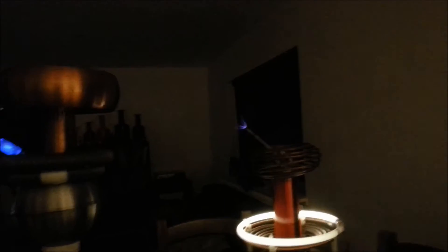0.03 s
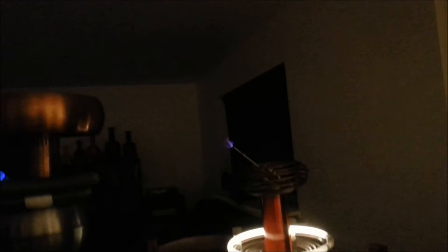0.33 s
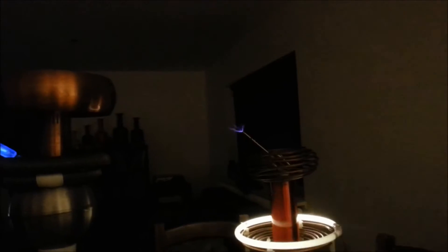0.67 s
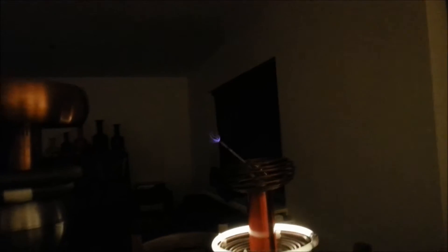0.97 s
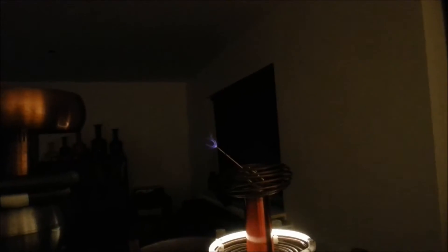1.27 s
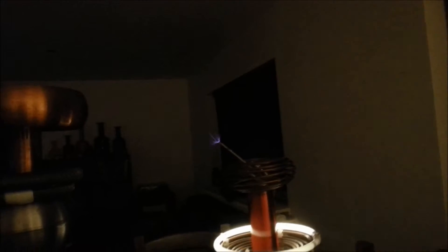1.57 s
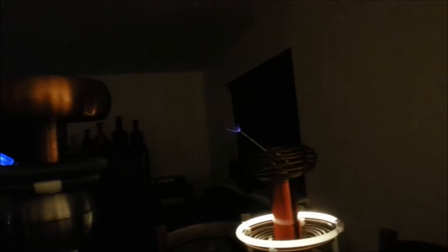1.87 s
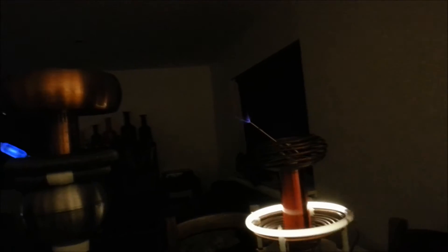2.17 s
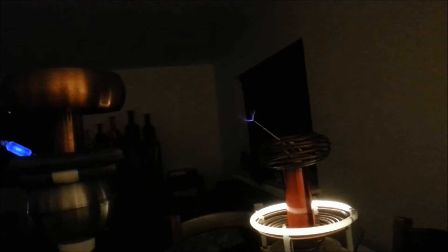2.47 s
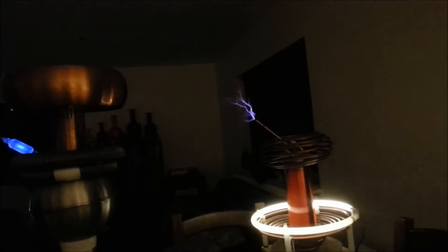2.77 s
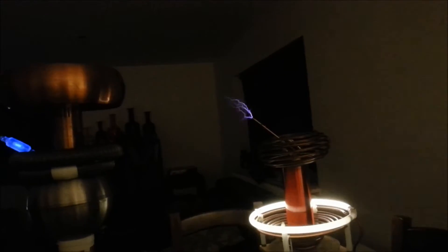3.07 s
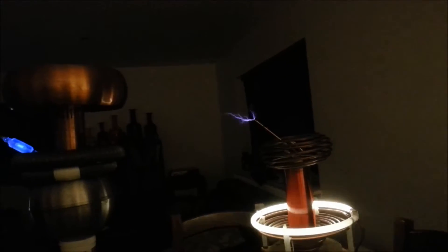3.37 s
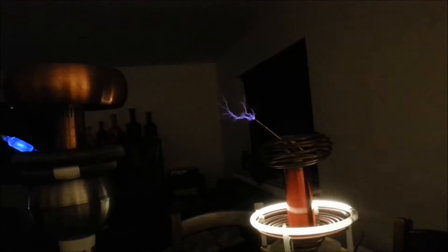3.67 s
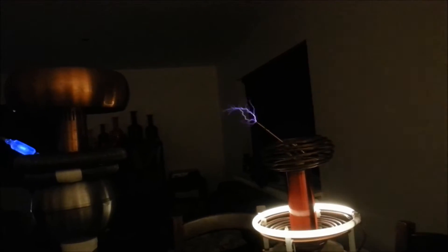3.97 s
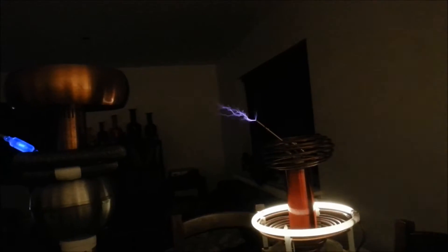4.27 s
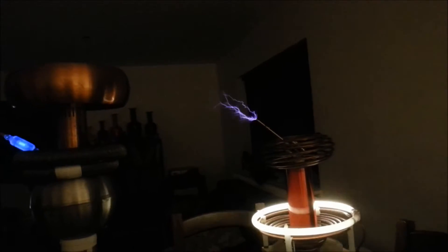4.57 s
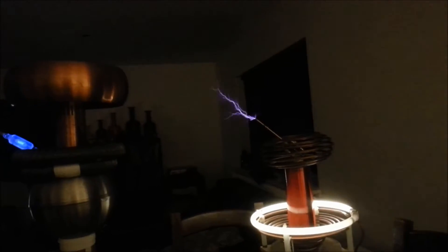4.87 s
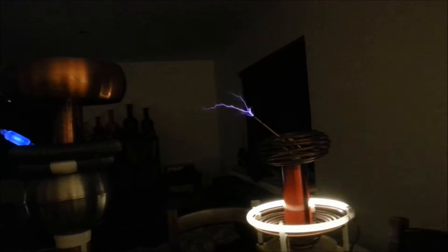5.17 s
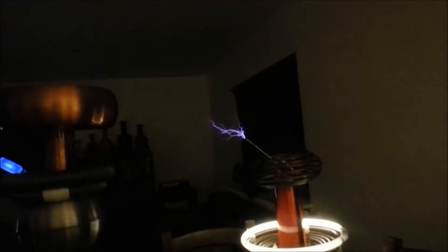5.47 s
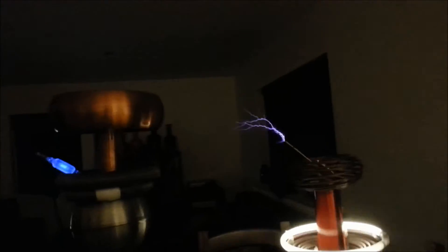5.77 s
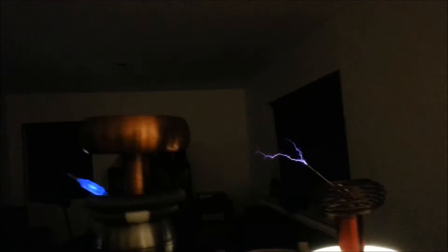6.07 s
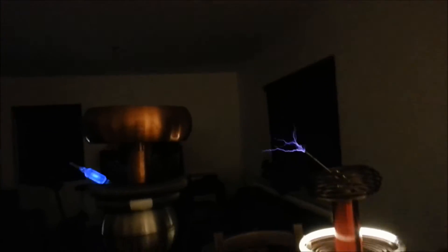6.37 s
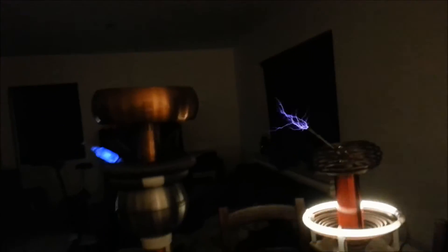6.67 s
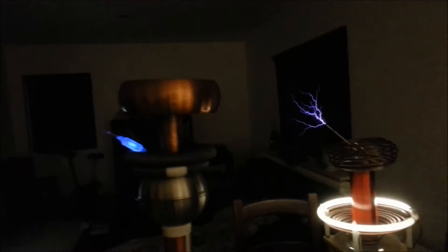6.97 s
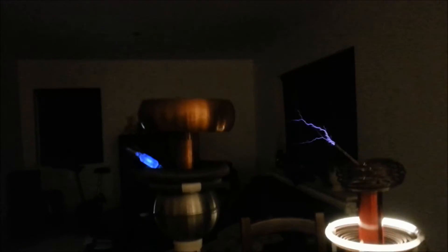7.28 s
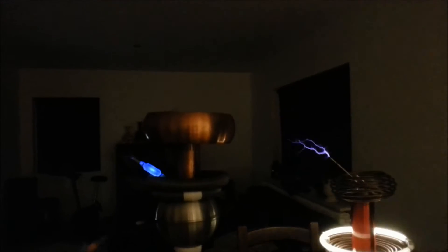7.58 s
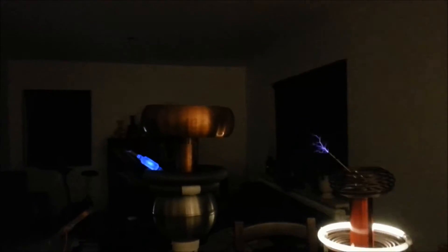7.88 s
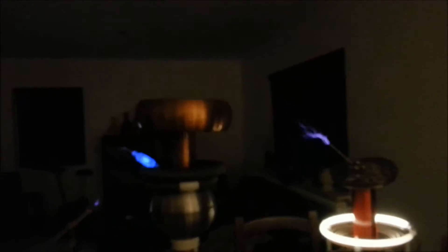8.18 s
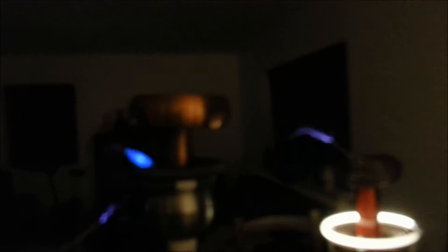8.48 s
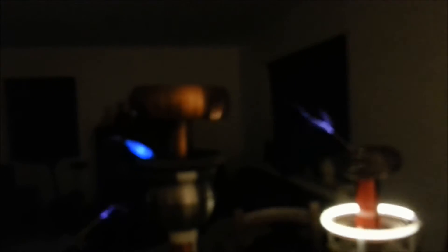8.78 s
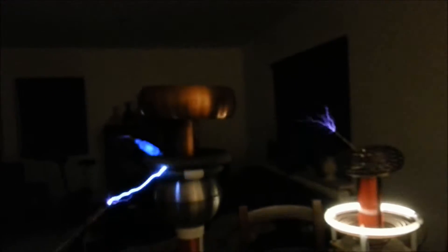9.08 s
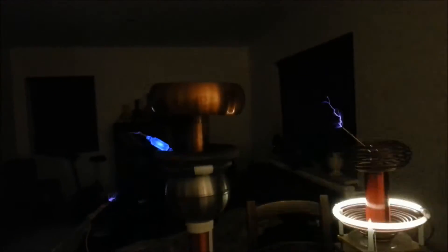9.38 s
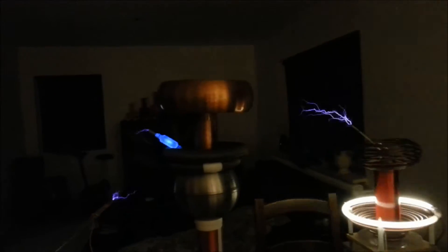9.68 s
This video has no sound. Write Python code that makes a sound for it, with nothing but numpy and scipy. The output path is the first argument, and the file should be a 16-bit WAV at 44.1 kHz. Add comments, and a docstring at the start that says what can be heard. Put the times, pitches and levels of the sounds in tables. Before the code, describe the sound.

In a small room, heard through a hand-held microphone, a nearby spark coil buzzes without a break. Its fine frying rasp turns into a fuller, flickering buzz as the sparks lengthen. Isolated snaps come from a bigger coil further back, then become more frequent over an uneven crackle. In the last second the bigger coil arcs to a rod, sizzling brightly and crackling deeply, while the first keeps buzzing.

```python
"""Two spark coils in a small room, heard through a hand-held microphone.
The near coil buzzes throughout, one snap per firing, at first as a thin, frying corona at its needle.
Near 3 s the corona grows into streamers that branch, collapse and regrow; a larger coil behind it
starts to spit. From 6.5 s that coil runs with a ragged crackle, from 8.6 s it adds a buzz of its own,
and at 9.2 s it arcs to a rod: a bright sizzle that thickens into a deep crackle."""
import sys
import numpy as np
from scipy import signal
from scipy.fft import rfft, irfft, next_fast_len
from scipy.io import wavfile
from scipy.ndimage import uniform_filter1d, minimum_filter1d

SR = 44100
rng = np.random.default_rng(int(sys.argv[2]) if len(sys.argv) > 2 else 0)


def wav_record(signal):
    """Record a signal, one row per channel, as 16-bit PCM in the file named by sys.argv[1]."""
    frames = np.transpose(np.atleast_2d(signal))
    bounded = np.clip(frames, -1, 1)
    # unit amplitude maps onto the largest positive 16-bit level
    quanta = np.round(bounded * 32767).astype(np.int16)
    wavfile.write(sys.argv[1], SR, quanta)


N = 437913


# Near coil firing rate: time_s, rate_hz
NEAR_RATE = [(0, 621.15), (6.3, 621.15), (8.9, 620.8), (9.3, 619.5), (9.93, 620.5)]
NEAR_HZ = NEAR_RATE[0][1]
# Discharge strength: time_s, relative_db
NEAR_LEVEL = [(0.05, -23.5), (0.38, -22.5), (1.57, -23), (1.82, -23), (2.72, -23), (2.75, -20), (3.05, -19),
              (6.11, -19), (6.3, -20), (7.69, -20.5), (7.83, -18), (8.32, -19), (9.85, -21.5)]

def near_coil():
    """Steady firings fuse into a buzz, shaped by the room, with the corona frying on top."""
    now = np.arange(N) / SR
    firings = firing_times(follow(NEAR_RATE, now)[0])
    echo = room(wet_db=3.5, shared_hz=1060)
    buzz = standing_waves(snaps(firings), echo, width_hz=6.6)
    buzz = stage_timbre(wall_echo(buzz), now)
    buzz = overtone_swells(shared_supply(buzz), now)
    buzz += corona_rasp(firings, echo, now)
    return buzz * gain_of(follow(NEAR_LEVEL, now)[0] + 3.0 + surge_db(now))


# Discharge shape (stage 0 corona, 1 streamers, 2 long streamers):
# time_s, stage, base_spread_ms, jitter_ms, branch_db
DISCHARGE = [(0, -0.07, 0.0216, 0.0047, 4.5), (1.9, 0.22, 0.021, 0.0035, 7.5),
             (2.7, -0.85, 0.032, 0.0036, 8), (2.82, 1.1, 0.03, 0.0085, 12.5), (4.4, 1.02, 0.038, 0.008, 13),
             (5.9, 1.115, 0.055, 0.0081, -1), (6.3, 1.3, 0.024, 0.0095, 3.5), (6.7, 1.8, 0.057, 0.0082, 9),
             (9.0, 2.21, 0.06, 0.0077, 22), (9.93, 1.9, 0.082, 0.0087, 20)]
# Branches, needle outwards: spread_factor, relative_db, life_s, lowpass_hz
BRANCHES = [(.6, 2.5, .026, 33000), (1.4, 0, .019, 24500), (4, 1, .021, 3370), (12, 10.5, .024, 480)]
# Microphone turning: time_s, left_lead_ms
EAR_LEAD = [(0, 0.031), (5.8, 0.013), (6.4, 0.079), (9.93, 0.12)]

def snaps(t):
    """Each firing snaps at the needle and along each branch; path length sets the arrival time."""
    _, spread_ms, jitter_ms, branch_db = follow(DISCHARGE, t)
    lead_ms = follow(EAR_LEAD, t)[0]
    supply_ripple = [(15.7, 1.0), (31.4, 0.41), (47.1, 1.0), (62.8, 1.0)]
    throb = gain_of(sum(db * np.sin(2 * np.pi * (hz * t + rng.random())) for hz, db in supply_ripple))

    def in_ears(size, path_ms):
        late_ms = path_ms + jitter_ms * rng.standard_normal(len(t))
        return np.array([clicks(t + ms / 1000, throb * size) for ms in (late_ms - lead_ms, late_ms)])

    out = in_ears(size=0.69, path_ms=0)  # needle
    for spread_factor, db, life_s, lowpass_hz in BRANCHES:
        size, place = branch(t, life_s)
        arrivals = in_ears(size * gain_of(db + branch_db), spread_factor * spread_ms * place)
        lowpass = signal.butter(1, min(lowpass_hz, .45 * SR), fs=SR, output="sos")
        out += signal.sosfiltfilt(lowpass, arrivals)
    return out


def branch(t, life_s, life_scatter=.45, rise_power=0.48, count=1500):
    """Size and place of a branch that shoots out, fades and restarts in a new direction."""
    span, vigour, place, heading = rng.standard_normal((count, 4)).T
    ends = np.cumsum(life_s * np.exp(life_scatter * span))
    life, age = np.divmod(np.interp(t, ends - ends[0], np.arange(count)), 1)
    life = life.astype(int)
    size = np.sin(np.pi * age ** rise_power) * (1 + 0.27 * np.tanh(vigour[life]))
    return size, place[life] + 1.94 * heading[life] * (age - .5)


# Buzz spectrum: harmonic, corona_db, streamer_db, long_streamer_db
OVERTONES = [(1, -24, -22, -22.5), (2, -12, -12.5, -8.5), (3, -9.5, -12.5, -5.5), (4, -2, -6, -5),
             (5, -8, -9, -5.5), (6, -2, 1, 3), (7, -1.5, -2.5, 0.5), (8, 6.5, 2, 6.5), (9, 3.5, -0.5, -1),
             (10, 0.5, -4, -1.5), (11, 1.5, -3.5, -3.5), (12, -0.5, -5, -2.5), (13, -2.5, -5.5, -4),
             (14, -3.5, -9.5, -11.5), (16, -4, -10.5, -10.5), (19, -5, -13.5, -12),
             (25, -4.5, -14.5, -20.5)]
# Buzz balance from standing waves and microphone: freq_hz, left_minus_right_db
BUZZ_BALANCE = [(620, -7), (1240, -11.5), (1860, 0.5), (2480, -5), (3100, 3), (3730, 8.5), (4350, 11),
                (4970, 11), (5600, 8), (7450, 12), (8070, 1), (8700, 8), (11800, 0.5), (14300, 8)]
# Low overtones as the microphone moves: time_s, boost_db
WARMTH = [(0, 1), (1.6, 1), (3.6, 0), (5.4, 3), (8, 0.5), (9.93, 3.5)]

def stage_timbre(x, now, warmth_hz=2850):
    """The spectrum crossfades with the stage of the discharge; the low overtones swell slowly."""
    stage, buzz = follow(DISCHARGE, now)[0], 0
    harmonic, *stages = np.transpose(OVERTONES)
    bass_rolloff = [(100, -73.0), (380, -57.0), (520, -16.5)]  # freq_hz, relative_db
    for k, levels_db in enumerate(stages):
        spectrum = bass_rolloff + list(zip(np.round(harmonic) * NEAR_HZ, levels_db))
        weight = np.maximum(1 - abs(stage - k), 0)
        buzz = buzz + weight * colour(x, spectrum, BUZZ_BALANCE)
    low = signal.sosfiltfilt(signal.butter(4, warmth_hz, fs=SR, output="sos"), buzz)
    return buzz + low * (gain_of(follow(WARMTH, now)[0]) - 1)


def shared_supply(buzz):
    """The branches share one supply, so their summed power holds steady over a few lives."""
    window = signal.windows.hann(SR // 10)
    power = signal.oaconvolve((buzz ** 2).mean(0), window / window.sum(), "same")
    return buzz / np.sqrt(power)


# Overtone swells and dips: centre_s, harmonic, change_db, half_width_s
SWELLS = [(3.1, 2, 0, .25), (4.3, 2, 3, 0.19), (6.3, 2, 0, 0.29), (9.1, 2, -12, 0.12), (6.202, 3, 5, 0.23),
          (4.205, 4, 4.5, 0.09), (5.66, 4, 4.5, .124), (6.6, 4, -7, 0.044), (0.08, 5, 1.5, 0.3),
          (8.7, 5, -2.5, 0.74), (1.7, 6, 4, 0.22), (4.48, 6, 5, .07), (4.702, 6, 4, .08),
          (5.697, 6, 4, .13), (6.09, 6, -5.5, 0.26), (0.95, 7, -4, 0.076), (2.35, 7, -3, 0.35),
          (4.4, 7, -4.5, .07), (4.6, 7, 0, .08), (5.6, 7, 0, .09), (5.9, 7, 8, 0.11), (7.6, 7, -7, 0.074),
          (8.0, 7, 2, .2), (8.3, 6, 3.5, 0.13), (8.2, 2, 2.5, 0.27), (7.2, 1, 3, 0.34), (0.78, 8, 1, 0.39),
          (1.4, 8, -5.5, 0.42), (2.4, 8, -4, .2), (4.5, 8, 4.5, .06), (5.06, 8, 0.5, .12),
          (5.6, 8, -2, .05), (5.9, 8, 2, .07), (7.67, 8, 1, 0.04), (8.65, 8, 3, .1)]

def overtone_swells(x, now, half_band_hz=110):
    """As streamer and microphone wander, single overtones stand out or sink."""
    size = next_fast_len(N, True)
    hz, spectrum = np.fft.rfftfreq(size, 1 / SR), rfft(x, size)
    out, coarse = x, now[::256]
    for k in np.unique(np.round(np.transpose(SWELLS)[1])):
        db = sum(change_db * np.exp(-((coarse - centre_s) / half_width_s) ** 2)
                 for centre_s, harmonic, change_db, half_width_s in SWELLS if round(harmonic) == k)
        overtone = irfft(spectrum * (abs(hz - k * NEAR_HZ) < half_band_hz), size)[:, :N]
        out = out + np.interp(now, coarse, gain_of(db) - 1) * overtone
    return out


# Deep streamer collapses, after one upward kick: centre_s, change_db
COLLAPSES = [(4.415, 7), (4.648, -12), (4.965, -12), (5.778, -7), (5.951, -9.5), (6.055, -22.5),
             (7.252, -10), (7.717, -7), (8.897, -12.5), (9.488, -11), (9.657, -17), (9.836, -6)]
# Streamer flares: centre_s, rise_db
FLARES = [(2.357, 3), (2.88, 6), (4.155, 1), (4.669, 4.5), (5.0, 3), (5.212, 8), (5.424, 1.5), (5.65, 8.5),
          (5.903, 4), (8.558, 2)]

def surge_db(now):
    """The level jumps as the streamer dies for a moment or shoots out further."""
    coarse = now[::32]
    collapse_db = bumps([*COLLAPSES, *falters()], coarse, half_width_s=0.0041)
    flare_db = bumps(FLARES, coarse, half_width_s=0.0066)
    return np.interp(now, coarse, collapse_db + flare_db)


def falters(mean_rate_hz=3.5, corona_db=-3, db_per_stage=-5.5, count=60):
    """Chance collapses, deeper as the streamers grow: centre_s, change_db."""
    wait, depth = rng.random((count, 2)).T
    centre_s = np.cumsum(.5 + wait) / mean_rate_hz
    mean_db = corona_db + db_per_stage * follow(DISCHARGE, centre_s)[0]
    return np.column_stack([centre_s, (.5 + depth) * mean_db])


# Corona spectrum: freq_hz, relative_db
RASP_SPECTRUM = [(600, -71), (1500, -53), (2200, -31), (2800, -39), (3300, -11), (4000, -1), (4550, 0.5),
                 (5300, -6), (7000, -5.5), (9000, -6), (14500, -24)]
# Corona against the buzz: time_s, relative_db
RASP_LEVEL = [(0, -9), (2.7, -11.5), (2.9, -16), (6.3, -34), (9.93, -8)]

def corona_rasp(t, echo, now, scatter_ms=0.069):
    """Tiny filaments, different at every firing, fry around the needle."""
    size, late = rng.standard_normal((len(t), 2)).T
    filaments = colour(clicks(t + scatter_ms * late / 1000, size), RASP_SPECTRUM, BUZZ_BALANCE)
    return gain_of(follow(RASP_LEVEL, now)[0]) * unit_rms(reverberate(filaments, echo))


# Large coil spark gap, even then ragged: time_s, rate_hz, scatter_ms
GAP = [(6.4, 560, 0.1), (6.85, 606, 0.21), (7.9, 596, 0.21), (8.6, 598, 0.37), (9.28, 614, 0.3513),
       (9.93, 604, 0.367)]
GAP_HZ = GAP[0][1]
# Large coil strength: time_s, relative_db
LARGE_LEVEL = [(6.48, -46.5), (6.6, -39), (6.72, -39.5), (6.86, -33.5), (7.13, -34), (7.3, -36.5),
               (7.4, -35), (7.6, -34.5), (7.8, -35), (8.25, -39), (8.5, -34.5), (8.62, -33), (8.8, -34.5),
               (9.0, -32), (9.33, -31.5), (9.45, -29), (9.54, -27), (9.7, -33), (9.8, -29), (9.93, -32.5)]
# Spark spectrum: freq_hz, relative_db
CRACK_SPECTRUM = [(40, -46), (85, -32), (140, -9), (260, -7), (400, -1), (550, -2.5), (1000, -3.5),
                  (1750, 0), (2400, -0.5), (3100, -9), (4600, 2), (6000, -5), (9000, -13), (12000, -13),
                  (15000, -33.5)]
# Spark balance: freq_hz, left_minus_right_db
CRACK_BALANCE = [(120, -18), (300, -8), (700, 1), (2800, 0.5), (4500, 13), (7500, 18), (10000, 4)]

def large_coil(uneven_db=7, sputter_db=4.8, wander_ms=0.311, crack_gain_db=8.0):
    """A ragged train of very unequal sparks, further off in the room, that ends in an arc."""
    t = firing_times(follow(GAP, np.arange(N) / SR)[0])
    wander, sputter, scatter, uneven = rng.standard_normal((len(t), 4)).T
    strength = gain_of(follow(LARGE_LEVEL, t)[0] + flutter_db(t)) * (t > LARGE_LEVEL[0][0])
    sizes = gain_of(uneven_db * np.minimum(uneven, 2.3) + sputter_db * drift(sputter, 6))
    sizes /= np.sqrt(uniform_filter1d(sizes ** 2, size=50))  # a big spark drains its neighbours' supply
    late_ms = follow(GAP, t)[1] * scatter + wander_ms * drift(wander, 40)
    t = t + late_ms / 1000
    echo = room(wet_db=-0.5, shared_hz=287)
    cracks = gain_of(crack_gain_db) * colour(clicks(t, strength * sizes), CRACK_SPECTRUM, CRACK_BALANCE)
    sparks = cracks + rod_sizzle(t, sizes) + thick_arc(t, sizes) + growl(t, strength * sizes)
    return reverberate(np.sqrt(SR / GAP_HZ) * sparks, echo)


def flutter_db(t, depth_db=0.56, rate_hz=35, count=600):
    """The large coil's strength wanders a little by chance."""
    return depth_db * np.interp(t * rate_hz, np.arange(count), rng.standard_normal(count))


def growl(t, sizes, pitch_hz=600, width_hz=90, gain_db=6, scatter_db_per_ms=-75, waver_ms=0.32):
    """Evenly timed sparks add up to a low, wavering note; it fades as their timing scatters."""
    late_ms = waver_ms * drift(rng.standard_normal(len(t)), 24)
    evenness = gain_of(gain_db + scatter_db_per_ms * follow(GAP, t)[1])
    pushes = clicks(t + late_ms / 1000, sizes * evenness)
    edges_hz = [pitch_hz - width_hz / 2, pitch_hz + width_hz / 2]
    band = signal.butter(2, edges_hz, "bandpass", fs=SR, output="sos")
    return signal.sosfilt(band, pushes) * np.sqrt(SR / width_hz)


# Strikes on the rod: time_s, relative_db
SIZZLE_LEVEL = [(9.18, -67.5), (9.22, -49), (9.25, -22), (9.33, -24), (9.37, -51), (9.5, -28), (9.6, -26),
                (9.68, -46), (9.93, -55)]
# Strike spectrum: freq_hz, relative_db
SIZZLE_SPECTRUM = [(300, -28.5), (2000, -9), (6000, -1), (10000, -7), (14500, -14)]

def rod_sizzle(t, sizes):
    """Sparks that reach the rod sizzle brightly."""
    return colour(clicks(t, sizes * gated_gain(SIZZLE_LEVEL, t)), SIZZLE_SPECTRUM, CRACK_BALANCE)


# Thick arc strength: time_s, relative_db
ARC_LEVEL = [(9.3, -47.5), (9.42, -26), (9.51, -24), (9.6, -27.5), (9.7, -32), (9.8, -32.5), (9.93, -32)]
# Thick arc spectrum: freq_hz, relative_db
ARC_SPECTRUM = [(50, -33.5), (130, -10.5), (400, 1.5), (800, -2.5), (1800, 1.5), (2500, -10), (3200, -11),
                (8000, -28.5), (15000, -47.5)]

def thick_arc(t, sizes):
    """The arc thickens into a deep crackle; random polarity leaves it unpitched."""
    polarity = rng.choice([-1, 1], len(t))
    return colour(clicks(t, sizes * gated_gain(ARC_LEVEL, t) * polarity), ARC_SPECTRUM, CRACK_BALANCE)


# Large coil spits: start_s, relative_db, decay_s, highpass_hz
SPITS = [(2.951, -43.5, .008, 150), (3.148, -29, 0.0043, 400), (4.103, -31, 0.0061, 516),
         (4.656, -28.5, 0.0047, 900), (5.444, -22.5, 0.0045, 336), (6.037, -20.5, .0067, 169),
         (6.112, -38, .015, 110), (6.505, -37, .01, 130), (6.641, -22.5, 0.0054, 130),
         (6.759, -26, .003, 130), (6.825, -25.5, .003, 130), (6.95, -29, 0.0036, 130),
         (7.136, -25, .006, 130), (7.219, -24, .003, 130), (7.345, -27.5, .003, 130),
         (7.382, -23.5, .004, 130), (7.449, -28, .002, 129.9), (8.011, -37, .003, 130),
         (8.08, -30, 0.0056, 250), (8.374, -26, 0.015, 130), (8.496, -28, .002, 130),
         (8.556, -25, .006, 130), (8.615, -21, .0046, 200), (8.732, -28, .003, 130),
         (8.796, -37, .003, 130), (8.902, -23, .0033, 130), (9.444, -22, .004, 110),
         (9.605, -24, .004, 110)]

def spits(gain_db=28, scatter_ms=0.33, uneven_db=2, count=30):
    """Each spit is a sharp crack and a few weaker firings; the thinner the spark, the less bass."""
    out, beat_s = np.zeros(N), np.arange(count) / GAP_HZ
    for start_s, db, decay_s, highpass_hz in SPITS:
        late, uneven, polarity = rng.standard_normal((3, count))
        age_s = beat_s + scatter_ms * np.tanh(late) * (beat_s > 0) / 1000
        sizes = np.sign(polarity) * gain_of(db + uneven_db * uneven) * np.exp(-beat_s / decay_s)
        burst = clicks(start_s + age_s, sizes)
        onset = round(start_s * SR)
        span = slice(max(onset - SR // 100, 0), onset + SR // 10)
        highpass = signal.butter(3, highpass_hz, "highpass", fs=SR, output="sos")
        out[span] += signal.sosfilt(highpass, burst[span])
    cracks = gain_of(gain_db) * colour(out, CRACK_SPECTRUM, CRACK_BALANCE)
    return reverberate(cracks, room(wet_db=-3.5, shared_hz=400))


# Large coil buzz as the discharge nears the rod: time_s, level_db
DRONE_LEVEL = [(8.6, -41), (9.0, -27.5), (9.3, -25.5), (9.55, -24.5), (9.93, -31)]
# Its spectrum: freq_hz, relative_db
DRONE_SPECTRUM = [(300, -42), (615, -15), (1230, -7), (1845, 0.5), (2460, -4), (3070, -10), (3690, -6),
                  (4300, 1.5), (4915, -1), (5530, -4), (8000, -15), (14000, -30)]

def drone(pitch_hz=614.5, waver_ms=0.072, jitter_ms=0.012, uneven_db=3):
    """The steady part of the large coil's discharge, slightly flat, beats against the near coil."""
    t = np.arange(DRONE_LEVEL[0][0], N / SR, 1 / pitch_hz)
    waver, jitter, uneven = rng.standard_normal((3, len(t)))
    late_ms = waver_ms * drift(waver, 40) + jitter_ms * jitter
    strength = gain_of(follow(DRONE_LEVEL, t)[0]) * np.sqrt(SR / pitch_hz)
    sizes = strength * unit_rms(gain_of(uneven_db * uneven))
    buzz = colour(clicks(t + late_ms / 1000, sizes), DRONE_SPECTRUM, BUZZ_BALANCE)
    return reverberate(buzz, room(wet_db=-6, shared_hz=1100))


# Standing waves, overtone core against its surroundings: freq_hz, contrast_db
STANDING_WAVES = [(620, -3.5), (1240, 0.5), (1860, -5.5), (2480, 2), (3100, -9.5), (3730, 0.5),
                  (4350, -6.5), (4970, 0), (6200, -2), (15000, -2)]
# Spectrum midway between overtones: freq_hz, gain_db
BETWEEN_OVERTONES = [(500, 16), (930, -22), (1550, -6), (2170, 0.5), (2800, -4), (3400, -6.5)]

def standing_waves(x, echo, width_hz):
    """Standing waves set the steady core of each overtone; echoes smear the flicker around it."""
    size = next_fast_len(N + SR)
    hz = np.fft.rfftfreq(size, 1 / SR)
    core = np.exp(-((hz - NEAR_HZ * np.round(hz / NEAR_HZ)) / width_hz) ** 2)
    between = np.sin(np.pi * hz / NEAR_HZ) ** 4
    response = rfft(echo, size)
    response += core * (hz < 8.5 * NEAR_HZ) * (response[0] - response)  # long waves: ears in step
    response /= (abs(response) + 1e-3) ** core
    response *= gain_of(at_hz(STANDING_WAVES, hz) * (core - 0.64))
    response *= gain_of(at_hz(BETWEEN_OVERTONES, hz) * between)
    return irfft(rfft(x, size) * response, size)[:, :N]


def wall_echo(x, delay_ms=2.6, sway_ms=0.197, echo_db=-18, sway_hz=(.35, .8, 1.9)):
    """A near reflection sways with the hand, differently per ear, so the overtones trade strength."""
    now, reflection = np.arange(N) / SR, []
    for ear in x:
        sway = unit_rms(sum(np.sin(2 * np.pi * (hz * now + rng.random())) / hz for hz in sway_hz))
        reflection.append(np.interp(now - (delay_ms + sway_ms * sway) / 1000, now, ear))
    return x + gain_of(echo_db) * np.array(reflection)


# Room decay: freq_hz, t60_s
ROOM_DECAY = [(150, 0.36), (1000, 0.622), (4000, 0.3), (9000, 0.25), (15000, 0.089)]

def room(wet_db, shared_hz, density=.1, predelay_s=.002, frame=256):
    """Direct sound plus sparse echoes, each band dying at its own rate; both ears share the bass."""
    count = SR * 2 // 3
    taps = rng.standard_normal((3, count)) * (rng.random((3, count)) < density)
    taps *= np.arange(count) > predelay_s * SR
    hz, t, bands = signal.stft(taps, SR, nperseg=frame)
    shared = 1 / (1 + (hz[:, None] / shared_hz) ** 2)
    ears = np.sqrt(shared) * bands[2] + np.sqrt(1 - shared) * bands[:2]
    decay = gain_of(-60 * t / at_hz(ROOM_DECAY, hz)[:, None])
    tail = signal.istft(ears * decay, SR, nperseg=frame)[1]
    echo = gain_of(wet_db) * tail / np.linalg.norm(tail, axis=1, keepdims=True)
    echo[:, 0] += 1
    return echo / np.linalg.norm(echo[0])


def reverberate(x, echo):
    """Convolves each ear with its room response."""
    return signal.fftconvolve(x, echo, axes=1)[:, :N]


def firing_times(rate_hz):
    """Times at which a rate curve completes each cycle."""
    turns = np.cumsum(rate_hz) / SR
    return np.interp(np.arange(1, int(turns[-1])), turns, np.arange(N) / SR)


def clicks(times, sizes, half_taps=8):
    """One band-limited click at each exact time."""
    index = np.round(times * SR).astype(int)[:, None] + np.arange(-half_taps, half_taps + 1)
    offset = index - times[:, None] * SR
    window = np.cos(np.pi * offset / (2 * half_taps + 2)) ** 2
    shape = np.sinc(offset) * window * ((index >= 0) & (index < N))
    return np.bincount(np.clip(index, 0, N - 1).ravel(), (sizes[:, None] * shape).ravel(), N)


def colour(x, spectrum, balance, size=4096, lead=64):
    """Gives clicks a minimum-phase ring of unit energy, then splits it between the ears."""
    hz = abs(np.fft.fftfreq(size, 1 / SR))
    ears = gain_of(np.outer([1, -1], at_hz(balance, hz)) / 2)
    magnitude = unit_rms(gain_of(at_hz(spectrum, hz)))
    causal = np.exp(np.conj(signal.hilbert(np.log(magnitude))))
    ring = np.fft.ifft(causal * ears / np.sqrt((ears ** 2).mean(0))).real
    ring = np.roll(ring, lead, axis=1)[:, :size // 2]
    return signal.oaconvolve(np.atleast_2d(x), ring, axes=1)[:, lead:lead + N]


def bumps(rows, t, half_width_s):
    """Gaussian swells or dips, in dB."""
    centre_s, db = np.transpose(rows)
    return np.exp(-((t[:, None] - centre_s) / half_width_s) ** 2) @ db


def follow(rows, t):
    """Each column of a time curve at times t."""
    time_s, *columns = np.transpose(rows)
    return [np.interp(t, time_s, column) for column in columns]


def gated_gain(rows, t):
    """Gain of a dB curve, zero before its first row."""
    return gain_of(follow(rows, t)[0]) * (t > rows[0][0])


def at_hz(rows, hz):
    """Interpolates on a log-frequency axis."""
    freq_hz, value = np.transpose(rows)
    return np.interp(np.log(hz + 1), np.log(freq_hz + 1), value)


def drift(noise, firings):
    """Noise averaged over several firings, at unit rms."""
    return unit_rms(uniform_filter1d(noise, firings))


def unit_rms(x):
    return x / np.sqrt(np.mean(x ** 2) + 1e-20)


def gain_of(db):
    return 10 ** (np.asarray(db) / 20)


def scene():
    """The near coil, and the large coil's crackle, spits and drone."""
    return near_coil() + large_coil() + spits() + drone()


def record(dry):
    """Microphone ports smear each snap into a short ring; a peak limiter and a lowpass follow."""
    ceiling, lowpass_hz = .88, 14700
    for port_hz, width_hz in [(5500, 3400), (7500, 2000), (11000, 540)]:
        radius = np.exp(-np.pi * width_hz / SR)
        poles = [1, -2 * radius * np.cos(2 * np.pi * port_hz / SR), radius * radius]
        dry = signal.lfilter(poles[::-1], poles, dry)  # allpass
    overshoot = np.maximum(abs(dry).max(0) / ceiling, 1)
    held_gain = minimum_filter1d(1 / overshoot, 601)
    limited = dry * uniform_filter1d(uniform_filter1d(held_gain, 301), 301)
    lowpass = signal.firwin(401, lowpass_hz, window=("kaiser", 9), fs=SR)
    return signal.oaconvolve(limited, lowpass[None], "same", axes=1)


dry = scene()
out = record(dry)
wav_record(out)
```